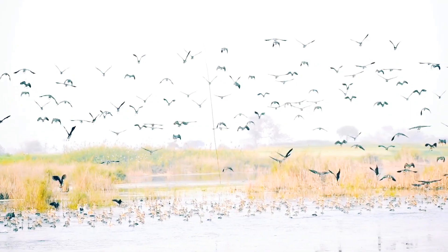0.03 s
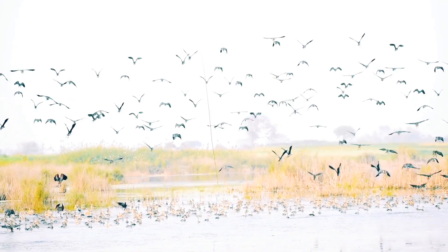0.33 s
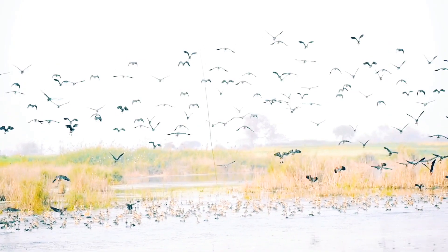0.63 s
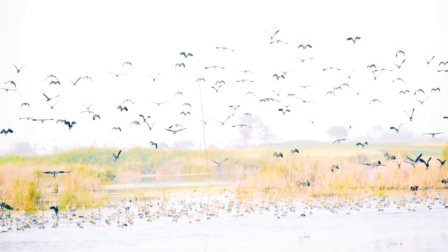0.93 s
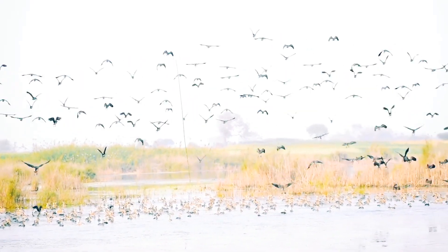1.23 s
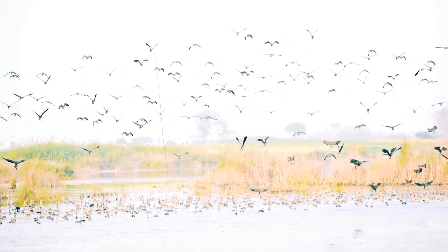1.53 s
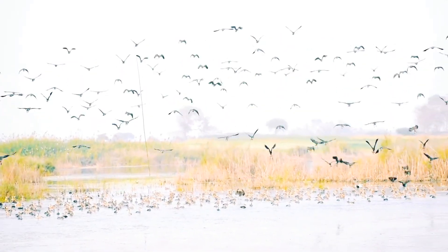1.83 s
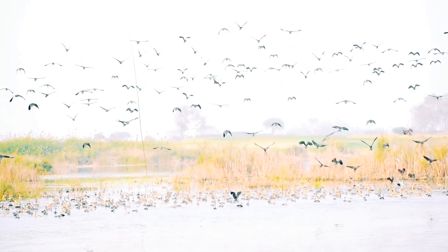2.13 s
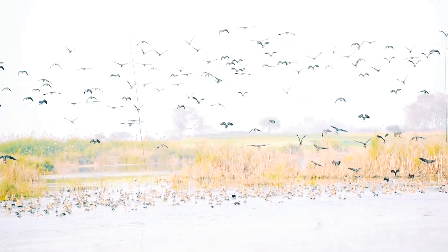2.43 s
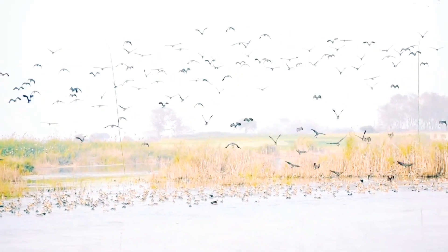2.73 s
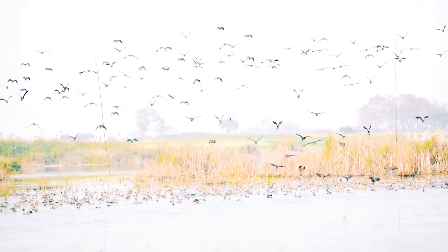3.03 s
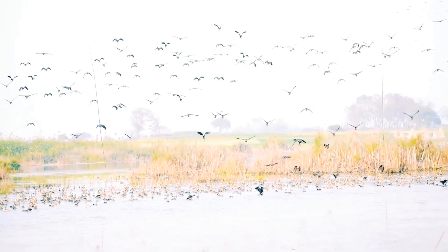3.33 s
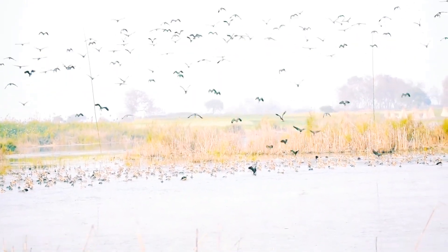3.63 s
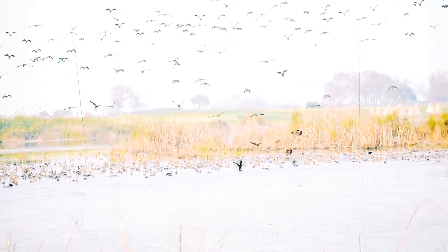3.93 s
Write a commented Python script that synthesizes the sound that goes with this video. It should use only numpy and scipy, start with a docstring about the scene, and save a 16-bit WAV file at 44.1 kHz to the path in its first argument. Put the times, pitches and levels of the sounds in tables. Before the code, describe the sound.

Many wild ducks call with short, high, overlapping whistles outdoors, above faint wind.

```python
"""A large flock of whistling ducks circles over a marsh. From the start, near birds give short, arched,
slightly trilled whistles, and hundreds farther off merge into a chorus that echoes from reeds and water.
Light wind moves in the reeds and a far engine hums. Within half a second wings slap the water and birds
taking off begin to throw up spray. Around 0.6 s a squabble briefly turns the voices hoarse.
The last spray comes near 1.6 s, two more slaps follow at 2 s, and the calling goes on to the end."""
import sys
import numpy as np
from scipy import signal
from scipy.fft import rfft, irfft
from scipy.io import wavfile

SR = 44100
rng = np.random.default_rng(int(sys.argv[2]) if len(sys.argv) > 2 else 0)


def to_wav(sig):
    """Store sig (one row per channel, or 1-D mono) as 16-bit WAV at the path in sys.argv[1].

    Samples outside -1..1 are clipped; the rate is SR.
    """
    pcm = np.clip(np.atleast_2d(sig), -1, 1) * 32767
    pcm = np.round(pcm).astype(np.int16)
    wavfile.write(sys.argv[1], SR, pcm.T)  # frames by channels


N = 176400  # 4 seconds


def from_db(db):
    """Turn decibels into a number to multiply a sound by."""
    return 10 ** (np.asarray(db) / 20)


def rms_one(x):
    """Scale a signal so that its average strength (rms) is 1."""
    return x / np.sqrt(np.mean(x ** 2) + 1e-20)


def in_time(rows):
    """Join rows of (time, values...) with straight lines, giving each value at every sample."""
    times, *columns = np.transpose(rows)
    return [np.interp(np.arange(N) / SR, times, column) for column in columns]


def colour(x, curve):
    """Make each frequency louder or softer along a curve of (frequency [Hz], level [dB])."""
    hz, db = np.transpose(curve)
    all_hz = np.arange(N // 2 + 1) * SR / N
    gains = from_db(np.interp(np.log(all_hz + 1), np.log(hz), db))
    return irfft(rfft(x) * gains, N)


def drift(rate_hz):
    """Smooth random wandering of size about 1; a higher rate wanders faster."""
    memory = np.exp(-2 * np.pi * rate_hz / SR)
    smooth = signal.lfilter([1], [1, -2 * memory, memory ** 2], rng.standard_normal(N + SR))
    return rms_one(smooth[SR:])


def widen(mid, side):
    """Sound from all around: left and right are nearly alike except in the treble."""
    # how strong the side part is next to the shared middle: (frequency [Hz], level [dB])
    width = [(60, -37.5), (200, -31), (4500, -21), (8000, -4.5)]
    return mid + colour(side, width) * np.array([[1], [-1]])


def noise(curve):
    """Stereo noise of strength 1, with its tone shaped by the curve."""
    mid, side = colour(rng.standard_normal((2, N)), curve)
    return rms_one(widen(mid, side))


def whistles(rows):
    """Each call is an almost pure tone that glides and trembles; squabbling birds turn hoarse."""
    # faint tone an octave above the call: (its frequency [Hz], level next to the main tone [dB])
    overtone = [(5000, -51), (7000, -22), (8400, -25), (9300, -37), (12000, -41)]
    squabble_s, squabble_half_s, calm_rasp = 0.6, 0.11, 0.22
    wobble_hz, flutter_db, rasp_hz, rasp_db = 32, 2.2, 110, 2.5
    arch_flatness, fade_s, max_trill, pan_db = 2.4, 0.002, 0.102, 1.5
    wobble, flutter, pitch_rasp, level_rasp = drift(90), drift(70), drift(260), drift(260)
    out = np.zeros((2, N))
    for start, length, first, middle, last, db in rows:
        offset, speed, depth, side = rng.random(4)
        k = np.arange(max(int(length * SR), 2))
        t = k / SR
        along = np.linspace(-1, 1, len(k))  # -1 as the call starts, 1 as it ends
        own = (k + int(offset * N)) % N  # each call gets its own stretch of the wandering
        squabble = np.exp(-((start + t - squabble_s) / squabble_half_s) ** 2)
        hoarse = calm_rasp + (1 - calm_rasp) * squabble
        bend = ((first + last) / 2 - middle) * np.abs(along) ** arch_flatness
        hz = middle + (last - first) / 2 * along + bend
        shaky_hz = hz + wobble_hz * wobble[own] + hoarse * rasp_hz * pitch_rasp[own]
        phase = 2 * np.pi * np.cumsum(shaky_hz) / SR
        overtone_gain = from_db(np.interp(2 * hz, *np.transpose(overtone)))
        voice = np.sin(phase) + overtone_gain * np.sin(2 * phase)
        fade = np.sin(np.pi / 2 * np.clip(np.minimum(t, t[-1] - t) / fade_s, 0, 1))
        trill_hz = 120 + 240 * speed
        trill = 1 + depth * max_trill * np.sin(2 * np.pi * trill_hz * t)
        tremble = rms_one(trill * from_db(flutter_db * flutter[own] + hoarse * rasp_db * level_rasp[own]))
        call = np.sqrt(2) * from_db(db) * fade * tremble * voice
        left_right = from_db(pan_db * (2 * side - 1) * np.array([[1], [-1]]))
        at = k + int(start * SR)
        inside = (at >= 0) & (at < N)
        out[:, at[inside]] += call[inside] * left_right
    return out


def near_birds():
    """The closest ducks, whose whistles stand out one by one."""
    # whistles: (start [s], length [s], first pitch [Hz], middle pitch [Hz], last pitch [Hz],
    # relative level [dB])
    calls = [(0, 0.03, 2510, 2407, 2300, -38), (0.087, 0.017, 3910, 4170, 4200, -37),
             (0.11, 0.022, 2950, 4340, 4770, -36), (0.207, 0.014, 3360, 4190, 4530, -34.5),
             (0.232, 0.073, 3276, 4120, 3600, -44), (0.286, 0.041, 3550, 4320, 4060, -46.5),
             (0.338, 0.051, 3950, 4150, 3870, -42), (0.362, 0.027, 3440, 3246, 3460, -36.5),
             (0.443, 0.036, 4130, 4230, 4070, -40), (0.474, 0.017, 2790, 3160, 3380, -35),
             (0.497, 0.035, 4000, 4240, 4280, -37), (0.528, 0.07, 3200, 3286, 3630, -42.5),
             (0.545, 0.054, 4160, 4350, 4450, -42.5), (0.598, 0.029, 3960, 4420, 4670, -37),
             (0.595, 0.014, 3070, 3200, 3330, -41), (0.665, 0.0093, 3410, 3150, 3430, -34.5),
             (0.672, 0.059, 4600, 4500, 4370, -38.5), (0.678, 0.076, 3060, 2595, 2840, -39.5),
             (0.695, 0.024, 3530, 3500, 3850, -36), (0.718, 0.023, 4040, 4100, 4260, -35),
             (0.822, 0.05, 3430, 3275, 3250, -36), (0.85, 0.083, 3687, 4170, 3900, -35),
             (0.853, 0.033, 3980, 4270, 4340, -34), (0.92, 0.069, 4500, 4760, 4670, -37),
             (0.926, 0.084, 3250, 2900, 2655, -43.5), (0.94, 0.019, 3780, 4220, 4500, -30.5),
             (0.962, 0.04, 4220, 4010, 4140, -33), (1.032, 0.025, 4700, 4090, 3660, -34.5),
             (1.099, 0.063, 3820, 4170, 4630, -40), (1.168, 0.032, 4930, 5230, 4670, -44.5),
             (1.209, 0.031, 3830, 4030, 3910, -36.5), (1.248, 0.083, 3600, 4340, 3930, -35.5),
             (1.297, 0.036, 3340, 3260, 3240, -36.5), (1.334, 0.022, 4330, 3940, 3900, -35),
             (1.383, 0.03, 2720, 2520, 2580, -41.5), (1.418, 0.026, 4630, 4610, 4990, -33.5),
             (1.496, 0.015, 3240, 3210, 3370, -35), (1.51, 0.035, 4150, 4940, 4800, -41),
             (1.514, 0.063, 3820, 4040, 4260, -43.5), (1.58, 0.079, 4550, 4420, 4620, -44.5),
             (1.655, 0.053, 4330, 4640, 4600, -39.5), (1.64, 0.065, 3080, 3990, 3930, -42.5),
             (1.715, 0.024, 4640, 4500, 3670, -42), (1.72, 0.038, 4180, 3460, 3130, -42.5),
             (1.748, 0.064, 3080, 3460, 3020, -41.5), (1.75, 0.037, 3620, 4170, 4100, -38),
             (1.783, 0.041, 3700, 4430, 4180, -41), (1.762, 0.056, 2915, 2605, 2730, -41.5),
             (1.812, 0.089, 3004, 4144, 2855, -38.5), (1.82, 0.029, 3020, 3190, 3070, -37.5),
             (1.843, 0.039, 4010, 4290, 4110, -36), (1.868, 0.056, 2980, 2690, 2560, -40.5),
             (1.922, 0.086, 2870, 4380, 3660, -36.5), (2.0, 0.056, 3360, 4150, 4090, -39),
             (2.0, 0.06, 1890, 2130, 2130, -58), (2.052, 0.041, 4460, 4170, 3200, -39.5),
             (2.095, 0.053, 3220, 4030, 3900, -39.5), (2.148, 0.062, 3333, 3106, 3690, -42.5),
             (2.182, 0.021, 4210, 3970, 4600, -36), (2.243, 0.15, 3930, 4074, 4420, -42.5),
             (2.371, 0.057, 3580, 4340, 4530, -42), (2.39, 0.077, 1593, 1890, 2510, -49.5),
             (2.442, 0.038, 4010, 3970, 5220, -37), (2.508, 0.115, 6020, 6130, 6020, -53.5),
             (2.59, 0.031, 3870, 4370, 4430, -41.5), (2.635, 0.043, 3250, 3270, 3100, -39.5),
             (2.645, 0.037, 3830, 4200, 5030, -37), (2.686, 0.071, 3175, 4680, 4060, -37),
             (2.77, 0.02, 2850, 3026, 2980, -38.5), (2.86, 0.14, 3350, 4890, 4210, -45.5),
             (2.862, 0.049, 3480, 4340, 4480, -37), (2.939, 0.079, 3830, 4070, 4300, -39),
             (3.045, 0.024, 4120, 4150, 4000, -42), (3.117, 0.042, 3960, 4600, 5500, -43),
             (3.205, 0.07, 2246, 2550, 2480, -46.5), (3.208, 0.038, 4610, 4530, 4500, -39.5),
             (3.219, 0.038, 2740, 3290, 3000, -40), (3.225, 0.052, 1750, 2010, 2050, -50),
             (3.238, 0.053, 4250, 4340, 4160, -41), (3.238, 0.039, 4020, 4060, 3990, -33.5),
             (3.308, 0.039, 3030, 3270, 3450, -36.5), (3.355, 0.075, 3470, 3090, 3600, -39),
             (3.392, 0.027, 4830, 4900, 5000, -43), (3.44, 0.054, 4670, 4610, 4060, -42.5),
             (3.445, 0.037, 9500, 9350, 9240, -63), (3.453, 0.022, 3510, 4050, 4250, -37),
             (3.478, 0.042, 3736, 4180, 4400, -41), (3.53, 0.098, 3150, 2720, 2712, -41.5),
             (3.546, 0.047, 3940, 4050, 4250, -38), (3.58, 0.039, 4450, 4100, 4010, -40.5),
             (3.615, 0.054, 4350, 4670, 4300, -40), (3.67, 0.11, 4150, 3910, 4080, -41),
             (3.682, 0.061, 3600, 3280, 3220, -45), (3.755, 0.05, 4450, 4820, 5400, -43.5),
             (3.81, 0.04, 4270, 3900, 4200, -39.5), (3.939, 0.019, 3130, 3490, 3680, -39.5)]
    return from_db(0.63) * whistles(calls)


def far_flock():
    """Distant birds call at random, each kind of voice around its own pitch."""
    # kinds of voice: (middle pitch [Hz], pitch spread [Hz], call rate [1/s], relative level [dB])
    voices = [(2000, 160, 12, -55), (2536, 170, 42, -50.5), (3237, 190, 52, -48.5), (4260, 290, 62, -48.5),
              (6410, 450, 8, -61)]
    typical_s, sag, spread_db = 0.044, 0.12, 3  # sag sets how far the pitch droops at a call's ends
    calls = []
    for hz, spread_hz, per_s, db in voices:
        chance = rng.random((400, 3))
        scatter = np.clip(rng.standard_normal((400, 3)), -2, 2)
        for k, ((when, rise, fall), (pitch, length, level)) in enumerate(zip(chance, scatter)):
            start = (k + 2 * when - 2) / per_s
            length_s = typical_s * np.exp(0.3 * length)
            middle = hz + spread_hz * pitch
            first = middle * (1 - 2 * sag * rise)
            last = middle * (1 - sag * (2 * fall - 0.5))
            if start < N / SR:
                calls.append((start, length_s, first, middle, last, db + spread_db * level))
    return whistles(calls)


def farthest_birds():
    """The farthest calls blur together into a hiss."""
    # tone of the blurred calls: (frequency [Hz], relative level [dB])
    tone = [(1300, -20), (2000, -2.5), (2550, 1), (2850, -20), (3200, 10.5), (3600, -19), (4200, -4),
            (4700, 0.5), (5500, -8.5), (8300, -18.5), (10000, -30), (15000, -53)]
    return from_db(-46.5) * noise(tone)


def echoes(calls):
    """Reeds and water scatter the calls back as a thin, dying tail."""
    echo_db, die_away_s = -14, 0.89  # the tail takes this long to drop 60 dB
    t = np.arange(SR) / SR
    tails = rng.standard_normal((2, SR)) * from_db(-60 * t / die_away_s)
    tails /= np.sqrt(np.sum(tails ** 2, axis=1, keepdims=True))
    mid, side = signal.fftconvolve(calls.mean(axis=0)[None], tails, axes=1)[:, :N]
    return from_db(echo_db) * widen(mid, side)


def wind():
    """Wind in the reeds and stirred water make a low rustle, strongest at the start."""
    # tone of the rustle: (frequency [Hz], relative level [dB])
    tone = [(25, -25.5), (55, 8), (160, -3.5), (370, 1), (520, -4.5), (680, -1), (1000, -6.5), (1800, -1.5),
            (5000, -41.5)]
    # loudness of the rustle: (time [s], level [dB])
    loudness = [(0, -44), (.5, -48.5), (1.4, -51), (4, -52)]
    level_db = in_time(loudness)[0] + 1.73 * drift(21)
    return from_db(level_db) * noise(tone)


def engine():
    """Only two low tones carry across the marsh, at 2 and 3 times the engine's firing rate."""
    # loudness of the hum: (time [s], lower tone [dB], upper tone [dB])
    loudness = [(0, -64, -56), (.6, -57, -55), (1.4, -60.5, -55), (1.82, -55, -69), (1.89, -69, -72),
                (1.95, -68, -56), (2.8, -57.5, -55.5), (4, -56.5, -60.5)]
    firing_hz = 32.73
    phase = 2 * np.pi * firing_hz * np.arange(N) / SR
    hum = np.zeros(N)
    for multiple, db in zip((2, 3), in_time(loudness)):
        hum += from_db(db + 1.1 * drift(5.5)) * np.sin(multiple * phase)
    return np.sqrt(2) * hum


def wing_slaps():
    """A wing hits the water with a short, splashy plop of unsteady pitch."""
    # slaps on the water: (time [s], pitch [Hz], peak level [dB])
    slaps = [(0.285, 1333, -39), (.291, 643, -38), (0.456, 390, -50), (2.021, 243, -40), (2.045, 1002, -41)]
    decay_s = 0.015
    out, t = np.zeros(N), np.arange(N) / SR
    for start, hz, db in slaps:
        age = np.clip(t - start, 0, 0.1)
        plop = np.sin(2 * np.pi * hz * age + 1.2 * drift(hz / 5))
        out += from_db(db) * (t >= start) * np.exp(-age / decay_s) * plop
    return out


def spray():
    """Birds taking off throw up short, grainy bursts of droplets."""
    # bursts of spray: (start [s], decay time [s], level [dB])
    bursts = [(0.455, 0.044, -51), (0.606, 0.17, -52), (0.932, 0.15, -49), (1.162, 0.014, -52),
              (1.552, 0.014, -49)]
    # tone of the droplets: (frequency [Hz], relative level [dB])
    tone = [(1000, 9), (3500, -13), (8000, -2), (10000, -7), (15000, -36)]
    loudness, t = np.zeros(N), np.arange(N) / SR
    for start, decay_s, db in bursts:
        loudness += from_db(db) * (t >= start) * np.exp(-np.maximum(t - start, 0) / decay_s)
    hiss = noise(tone)
    grains = rms_one(from_db(4.8 * drift(150)))
    return loudness * hiss * grains


def scene():
    """Near and far birds with their echoes, over the quieter sounds of the marsh."""
    # how the distant chorus swells and sinks: (time [s], level change [dB])
    chorus = [(0, -2), (.38, -2), (.55, 2.5), (.72, 0), (.95, 0), (1.15, -1.5), (1.35, 1.5), (1.6, -0.5),
              (2.4, 0), (2.8, -2), (3.25, 0), (4, 0.5)]
    swell = from_db(in_time(chorus)[0])
    background = wind() + engine() + wing_slaps() + spray()
    blur = swell * farthest_birds()
    near = near_birds()
    far = swell ** 1.3 * far_flock()  # these calls swell and sink more than the blur
    return near + far + echoes(near + from_db(-4) * far) + blur + background


def record(dry):
    """Cut away the very highest treble, 70 dB down from 16000 Hz up."""
    return signal.sosfilt(signal.cheby2(12, 70, 16000, fs=SR, output="sos"), dry)


dry = scene()
out = record(dry)
to_wav(out)
```